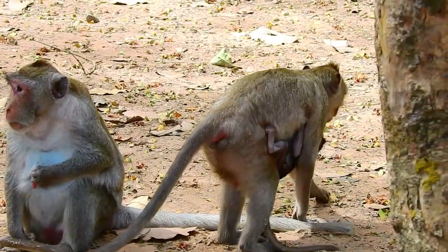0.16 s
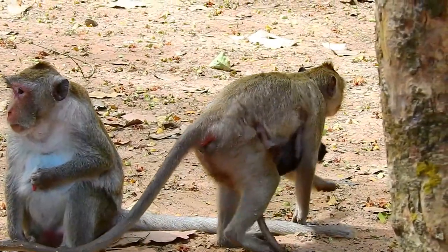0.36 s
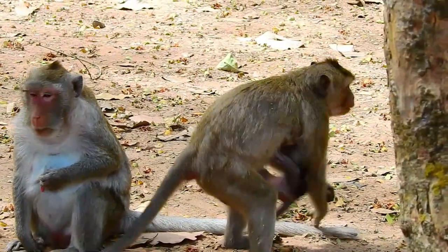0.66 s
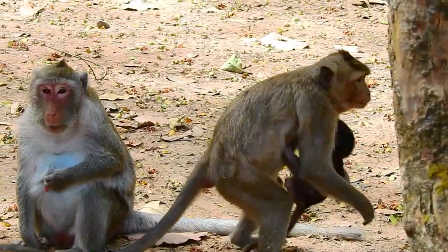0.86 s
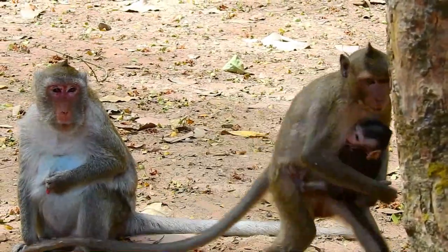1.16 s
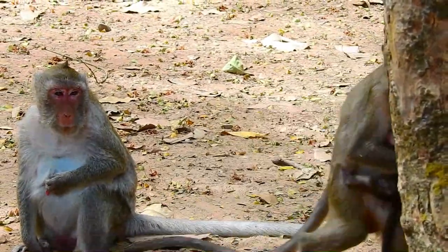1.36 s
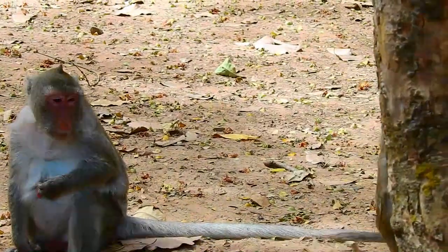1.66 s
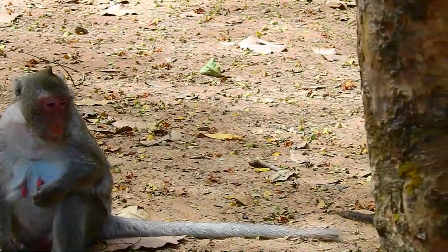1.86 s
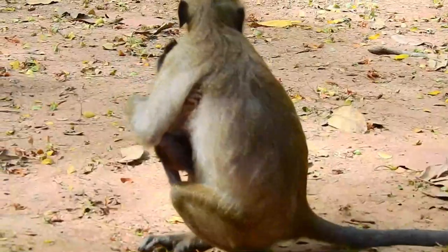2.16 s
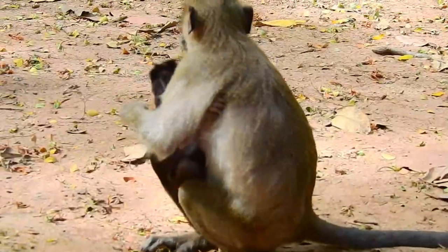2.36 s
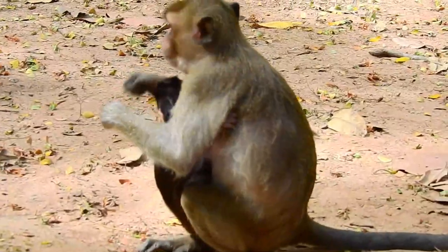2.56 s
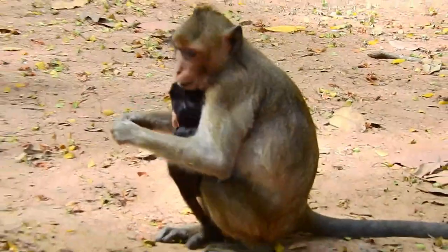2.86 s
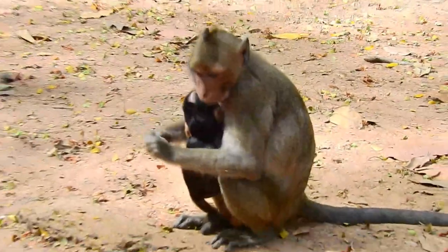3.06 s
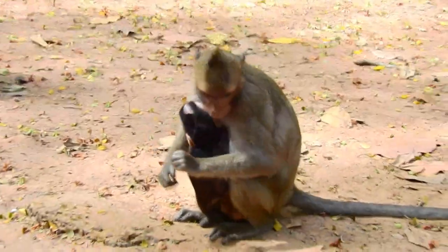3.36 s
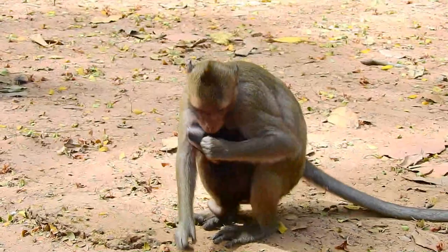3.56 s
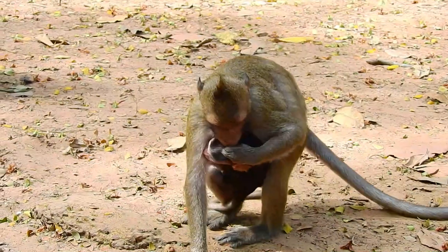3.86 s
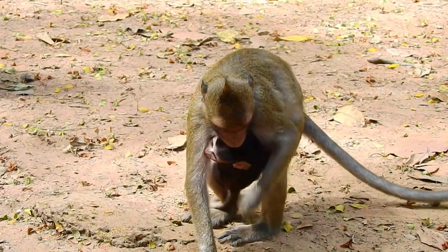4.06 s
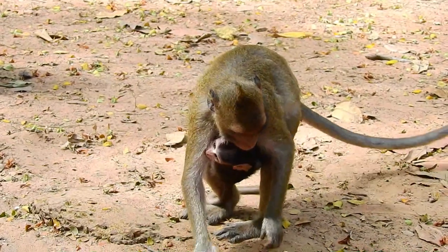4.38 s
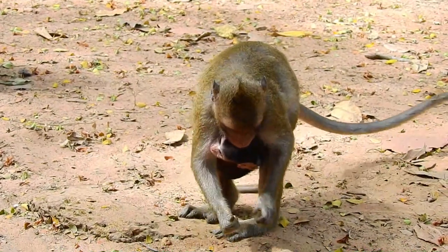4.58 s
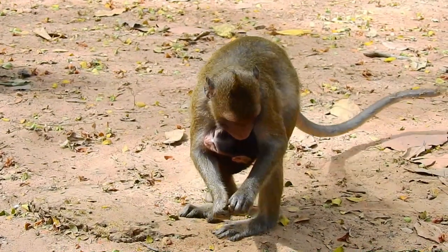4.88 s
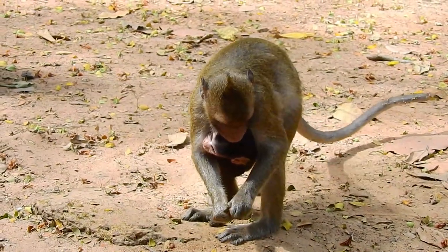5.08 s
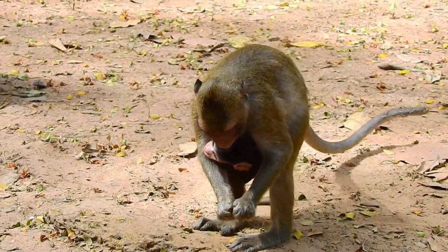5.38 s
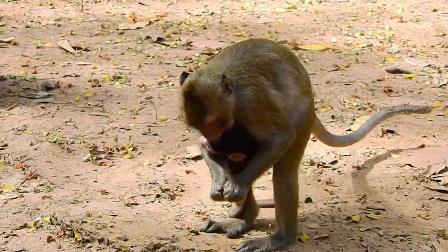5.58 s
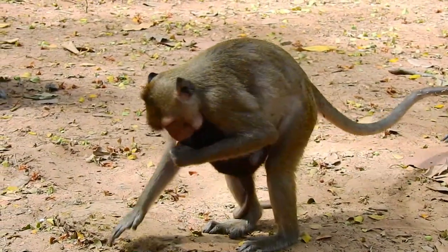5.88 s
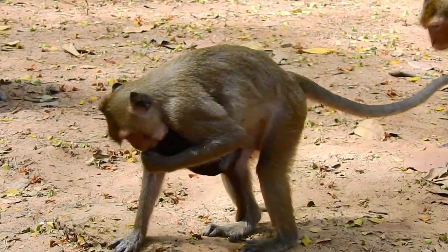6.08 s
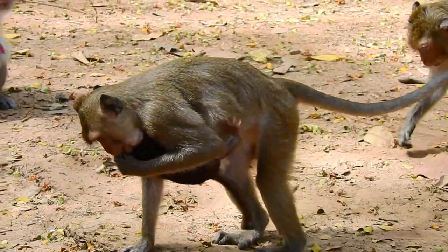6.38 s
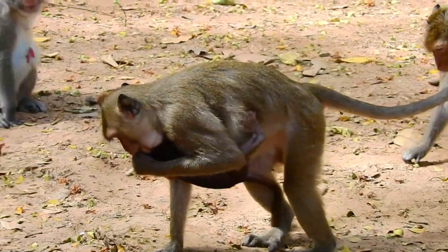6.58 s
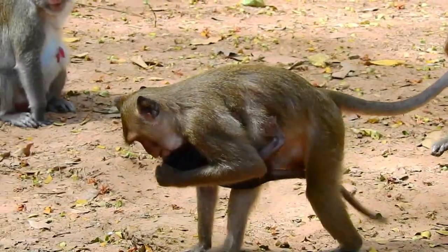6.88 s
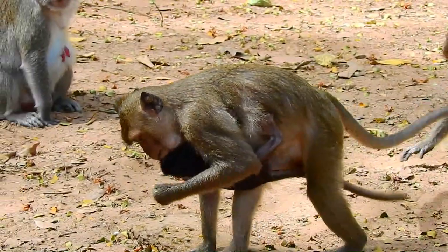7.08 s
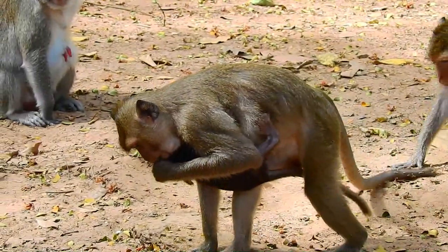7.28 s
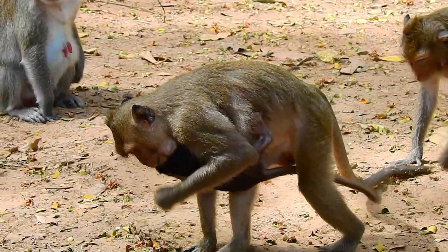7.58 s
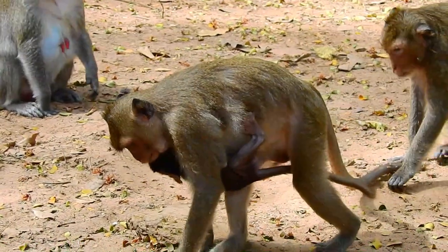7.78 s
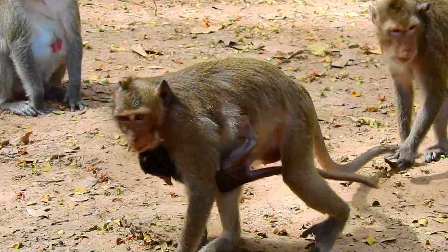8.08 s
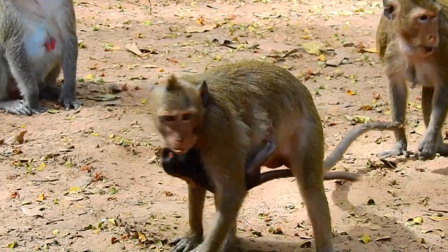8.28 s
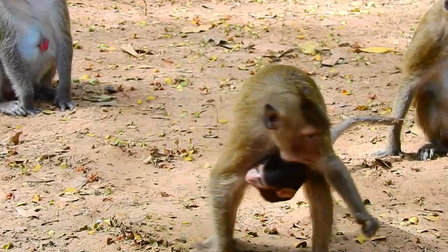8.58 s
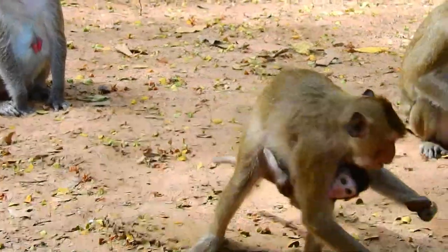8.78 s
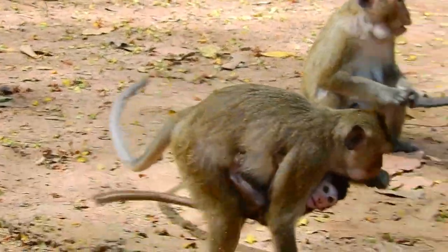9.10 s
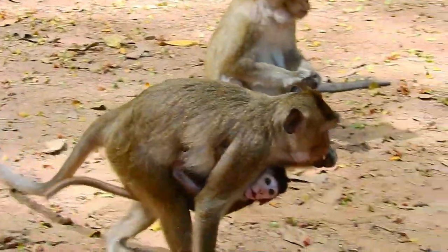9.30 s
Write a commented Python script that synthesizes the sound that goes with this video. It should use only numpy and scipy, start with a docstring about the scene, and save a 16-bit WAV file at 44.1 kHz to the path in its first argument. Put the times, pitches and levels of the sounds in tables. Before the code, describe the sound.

Harsh, high infant monkey cries near the microphone, one brief dropout, then soft echoing coos, barks and a yelp over low distant engine thudding.

```python
"""On open ground among trees, a far engine thuds and rumbles under faint air from the start.
Close to the microphone an infant macaque chirps, rasps and squeals, some calls with low falling tails.
Dry clicks and thin, high, far whistles come now and then; the sound drops out once for a moment.
Then faint echoed calls and another young macaque's coos ring through the wood; later the infant barks and yelps.
Voices are moving tones, roughened by flapping folds and coloured by the mouth; clicks ring modes; air is noise."""
import sys
import numpy as np
from scipy import signal
from scipy.fft import rfft, irfft, next_fast_len
from scipy.io import wavfile
from scipy.ndimage import uniform_filter1d

SR = 44100
rng = np.random.default_rng(int(sys.argv[2]) if len(sys.argv) > 2 else 0)


def master(y):
    """Save y as 16-bit WAV."""
    cut = np.clip(np.atleast_2d(y).T, -1, 1)
    pcm = np.round(cut * 32767)  # scale
    wavfile.write(sys.argv[1], SR, pcm.astype(np.int16))


N = 416304
TIME = np.arange(N) / SR
# In every table level_db is relative: colouring, distance and the stereo mix come after it.


def from_db(db):
    """Decibels to gain."""
    return 10 ** (np.asarray(db) / 20)


def rms_one(x):
    """Scale to rms 1."""
    return x / np.sqrt(np.mean(x ** 2) + 1e-20)


def at_hz(points, hz):
    """Read a table on a log-frequency axis."""
    points = np.array(points)
    return np.interp(np.log(np.maximum(hz, 1)), np.log(points[:, 0]), points[:, 1])


def colour(x, spectrum):
    """Give a signal a smooth spectrum."""
    size = next_fast_len(N + 4096)
    gain = from_db(at_hz(spectrum, np.fft.rfftfreq(size, 1 / SR)))
    return irfft(rfft(x, size) * gain, size)[..., :N]


def drift(rate_hz):
    """Slow chance with spread 1: noise through two equal one-pole lowpasses."""
    r = np.exp(-2 * np.pi * rate_hz / SR)
    slow = signal.lfilter([1], [1, -2 * r, r * r], rng.standard_normal(N + SR))
    return rms_one(slow[SR:])   # the first second lets the filter settle


def resonate(x, hz, width_hz):
    """One resonance with gain 1 on top."""
    r = np.exp(-np.pi * width_hz / SR)
    zeros = np.array([1, 0, -1]) * (1 - r * r) / 2
    poles = [1, -2 * r * np.cos(2 * np.pi * hz / SR), r * r]
    return signal.lfilter(zeros, poles, x + 1e-18)


def evened(x, window_s):
    """Hold the short-term rms at 1."""
    power = np.abs(uniform_filter1d(x * x, int(window_s * SR)))
    return x / np.sqrt(power + 1e-12)


def stereo_noise(spectrum, alike):
    """Coloured noise, partly alike in both channels; rms 1."""
    mid, side = rng.standard_normal((2, N))
    alike = np.clip(alike, 0, 1)
    both = np.sqrt(1 + alike) * mid + np.sqrt(1 - alike) * side * [[1], [-1]]
    return rms_one(colour(both, spectrum))


def pan(x, left_db):
    """Place a sound between the left and right channels by level."""
    return x * from_db(np.array([[left_db], [-left_db]]) / 2)


# spectrum of the far engine's thuds and rumble: freq_hz, level_db
RUMBLE_SPECTRUM = [(24, -63), (40, -12.5), (85, 5), (125, 3), (170, -1.5), (230, -12), (350, -15.5),
                   (1400, -22.5), (8000, -51.5)]
# the engine's course: time_s, level_db, depth_db (change of its deepest part)
ENGINE_COURSE = [(1.7, -44.5, -4), (2, -41, -2.5), (5.1, -44.5, 3.5), (6.1, -45, -4), (9.4, -48, 1.5)]


def engine(firing_hz=19.5, thud_db=-4, noise_db=-2, uneven_db=4):
    """A far engine: irregular exhaust pulses ring a low resonance in a bed of rumble."""
    turns = np.floor(np.cumsum(firing_hz * (1 + .1 * drift(4.64))) / SR)
    firings = np.diff(turns, prepend=0) * from_db(uneven_db * drift(16.2))
    thuds = rms_one(colour(resonate(firings, 119, 126), RUMBLE_SPECTRUM))
    sound = from_db(thud_db) * thuds + from_db(noise_db) * stereo_noise(RUMBLE_SPECTRUM, alike=0.95)
    time_s, level_db, depth_db = np.transpose(ENGINE_COURSE)
    rumble = from_db(np.interp(TIME, time_s, level_db)) * sound
    deep = colour(rumble, [(100, 0), (160, -25)])
    return rumble + (from_db(np.interp(TIME, time_s, depth_db)) - 1) * deep


# spectrum of the air around the microphone: freq_hz, level_db
AIR_SPECTRUM = [(200, -7), (1300, -13), (4200, -12), (6400, -8.5), (8000, -17), (15000, -56.5)]


def air(air_db=-57):
    """Faint, broad noise of the open place, slowly wavering in level."""
    return from_db(air_db + 1.3 * drift(4)) * stereo_noise(AIR_SPECTRUM, alike=0.61)


def note(length_s, attack_s, release_s):
    """Progress from 0 to 1 through a call, and its attack, hold and release."""
    t = TIME[:int((length_s + release_s) * SR)]
    release = np.clip(1 - (t - length_s) / release_s, 0, 1)
    return np.minimum(t / length_s, 1), np.minimum(t / attack_s, 1) * release


def slurred(notes):
    """Join notes into pitch, loudness and roughness; where two overlap the stronger leads."""
    power, pitch, rough = np.full(N, 1e-14), np.full(N, 5000 * 1e-14), np.zeros(N)
    for start, note_hz, gain, note_rough in notes:
        on = slice(int(start * SR), int(start * SR) + len(gain))
        power[on] += gain ** 2
        pitch[on] += gain ** 2 * note_hz
        rough[on] += gain ** 2 * note_rough
    return pitch / power, np.sqrt(power), np.clip(rough / power, 0, 1)


# near chirps, sliding up or down: start_s, length_s, first_hz, last_hz, level_db, final_roughness (0-1)
CHIRP_TABLE = [(0.414, 0.011, 3878, 3175, -35, 0.71), (2.375, 0.025, 4400, 6860, -29, 1.01),
               (2.888, 0.019, 4000, 7830, -24, 0.56), (3.414, 0.016, 4500, 6130, -22.5, 0.42),
               (6.188, 0.0083, 4000, 3720, -22, 0.29), (6.455, 0.02, 4900, 6700, -25, 0.51),
               (6.702, 0.027, 4000, 5250, -27.5, 0.71), (7.584, 0.021, 3400, 3900, -36.5, 0.54),
               (7.896, 0.0091, 2300, 1900, -52.5, 0)]


def chirp_notes(attack_s=0.0054, release_s=.008, onset_rough=0.2, tear_power=1.5):
    """A chirp starts nearly clean and tears towards the end of its slide."""
    for start, length, first_hz, last_hz, level_db, rough in CHIRP_TABLE:
        part, gain = note(length, attack_s, release_s)
        # a share of the roughness is there at once; a higher power brings the rest later
        strain = onset_rough + (1 - onset_rough) * part ** tear_power
        yield start, first_hz * (last_hz / first_hz) ** part, gain * from_db(level_db), rough * strain


# near rasps, torn from the first moment: start_s, length_s, first_hz, last_hz, level_db, roughness (0-1)
RASP_TABLE = [(0.424, 0.018, 4900, 6320, -25, 0.88), (0.447, 0.052, 6800, 4870, -28, .75),
              (0.506, .016, 6320, 5400, -25, 0.8), (0.523, 0.0194, 4680, 4436, -23, 0.58),
              (0.555, 0.038, 4410, 4200, -35.5, 0.78), (0.602, 0.0411, 6080, 5770, -30, 0.85),
              (0.645, .055, 5790, 6280, -34, 0.77), (0.705, 0.095, 6200, 7080, -40, 0.94),
              (1.033, 0.051, 6040, 7200, -37, 0.94), (1.26, .025, 4900, 4363, -25, .7),
              (1.966, 0.044, 6250, 6000, -27, 0.63), (2.42, .012, 6550, 6280, -26.5, 0.89),
              (2.529, 0.044, 5000, 4730, -26.5, .88), (2.577, 0.042, 4860, 6600, -29.5, 0.59),
              (2.617, 0.048, 6560, 5455, -26, 0.81), (2.651, 0.024, 4654, 3130, -24, 0.65),
              (2.912, 0.024, 7000, 6500, -24, 0.97), (3.017, 0.045, 4990, 4560, -24.5, .85),
              (3.066, .097, 4073, 3730, -26.5, 0.74), (3.167, 0.027, 4040, 3146, -28, 0.59),
              (3.438, 0.016, 4430, 4290, -24.5, 0.55), (3.49, .022, 6090, 5885, -24, 0.62),
              (3.514, 0.035, 3786, 3913, -24.5, 0.6), (3.556, 0.031, 3850, 3667, -25, 0.9),
              (6.5, .02, 4430, 4270, -24, 0.72), (6.53, 0.043, 6500, 6060, -33.5, 0.6),
              (6.574, 0.02137, 4600, 4180, -26.5, .9), (6.596, 0.035, 4200, 3810, -24.5, 0.67),
              (6.77, 0.043, 6770, 6420, -36.5, 0.6), (6.83, .006, 4350, 4216, -24, 0.51)]


def rasp_notes(attack_s=0.0046, release_s=0.018, sag_db=3.5):
    """A rasp starts hard and stays rough while its pitch slides and its level sags."""
    for start, length, first_hz, last_hz, level_db, rough in RASP_TABLE:
        part, gain = note(length, attack_s, release_s)
        level = from_db(level_db - sag_db * part)
        yield start, first_hz * (last_hz / first_hz) ** part, gain * level, rough


# near squeals, whistled arches that flutter in the middle:
# start_s, length_s, first_hz, middle_hz, last_hz, level_db, roughness (0-1)
SQUEAL_TABLE = [(0.824, 0.062, 7650, 8100, 7403, -45.5, 0.3), (1.09, 0.048, 8300, 10260, 11900, -49.5, 0.1),
                (1.138, 0.053, 10370, 10720, 10560, -37.5, 0.77),
                (1.202, 0.047, 11500, 10240, 9530, -42, .05), (2.02, 0.056, 7276, 8370, 7650, -38, 0.2),
                (2.449, 0.071, 9700, 12000, 9900, -51.5, 0.65), (2.924, .09, 8750, 10230, 9160, -40, 0.9),
                (6.476, 0.081, 8500, 9400, 9000, -38, 0.94), (6.733, 0.097, 6980, 8400, 7860, -42, 0.76)]


def squeal_notes(attack_s=0.0036, release_s=0.0096, tear_power=0.22):
    """A squeal's pitch follows a parabola and frays towards the middle."""
    for start, length, first_hz, middle_hz, last_hz, level_db, rough in SQUEAL_TABLE:
        part, gain = note(length, attack_s, release_s)
        arch = 1 - (2 * part - 1) ** 2
        slide = first_hz + (last_hz - first_hz) * part
        pitch = slide + (middle_hz - (first_hz + last_hz) / 2) * arch
        yield start, pitch, gain * from_db(level_db), rough * arch ** tear_power


# mouth resonances that flare and fade inside a torn call: freq_hz, width_hz
MOUTH_FLARES = [(3800, 1200), (4550, 350), (6300, 650)]


def voice(notes, throat, flap_hz, flap_wander, chaos, bend, rasp_db, buzz_db, overtone_db, flare_db):
    """Folds whistle; pressed, a slower flapping splits off side tones and, turning chaotic, tears the whistle."""
    pitch, loud, rough = slurred(notes)
    # the flapping glides slowly and turns chaotic at the greatest strain; every other flap is then uneven
    flap_rate = flap_hz * (1 + flap_wander * (drift(40) + chaos * rough ** 4 * drift(350)))
    flap_phase = 2 * np.pi * np.cumsum(flap_rate) / SR
    flap = np.sin(flap_phase) + .7 * chaos * rough * drift(150) * np.sin(flap_phase / 2)
    slow_waver = (.006 + .03 * chaos * rough) * drift(70)
    fast_waver = .03 * chaos * rough ** 2 * drift(400)
    pitch = pitch * (1 + slow_waver + fast_waver)
    phase = 2 * np.pi * np.cumsum(pitch) / SR
    # overtones only carry inside the mouth's passband, applied twice
    second = np.sin(2 * phase) * (2 * pitch < SR / 2)
    third = np.sin(3 * phase) * (3 * pitch < SR / 2)
    overtones = colour(colour(second + third, throat), throat)
    whistle = np.sqrt(2) * (np.sin(phase) + from_db(overtone_db) * overtones)
    # each flap bends the tone, lets a puff of air through and shuts with a sharp pulse
    bent = phase + bend * rough * flap
    puff = np.exp(.7 * rough * flap)
    pulses = rms_one(np.exp(40 * (np.cos(flap_phase) - 1)))
    buzz = from_db(buzz_db) * rough * (pulses - pulses.mean())
    rasp = from_db(rasp_db) * rough * rng.standard_normal(N)
    torn = colour((np.sin(bent) + rasp) * puff + buzz, throat)
    flares = sum(resonate(torn, hz, width) * from_db(flare_db + 7 * drift(45)) for hz, width in MOUTH_FLARES)
    torn = evened(torn + flares, .004)
    tear = np.sin(np.pi / 2 * rough)
    mixed = evened((1 - tear ** 2) * whistle + tear * torn, .004)
    return loud * mixed * from_db(1.5 * rough * drift(70))


# the infant's throat and open mouth: freq_hz, level_db
OPEN_THROAT = [(1300, -19), (2700, -14.5), (3600, -6.5), (5200, -1.5), (6400, 3), (7600, 0), (10500, -3.5),
               (15000, -29.5)]
# the mouth drawn back for a squeal: freq_hz, level_db
DRAWN_THROAT = [(1000, -18.5), (3600, -13), (6400, 1.5), (8000, -0.5), (10700, -5.5), (15500, -16.5)]


def infant_cries():
    """Close to the microphone, chirps and rasps tear chaotically; thin squeals above them flutter evenly."""
    torn = voice([*rasp_notes(), *chirp_notes()], OPEN_THROAT, flap_hz=1100, flap_wander=.18, chaos=1.15,
                 bend=1.5, rasp_db=-10, buzz_db=-13, overtone_db=-14, flare_db=-3)
    thin = voice(squeal_notes(), DRAWN_THROAT, flap_hz=925, flap_wander=.015, chaos=.15,
                 bend=2.1, rasp_db=-13, buzz_db=1, overtone_db=-8, flare_db=-12)
    return torn + thin


# near dry clicks: time_s, level_db (peak before colouring), sharpness (0 dull knock - 1 bright snap)
CLICK_TABLE = [(0.828, -47.5, 0.08), (2.738, -39.5, 0.67), (3.033, -37, 0.24), (3.484, -24.5, 0.99),
               (6.967, -35, 0.28), (6.978, -29, 1), (7.474, -39.5, 0.014), (7.4856, -30, 1),
               (7.496, -36.5, 0.94), (8.738, -40, 0), (9.021, -42.5, 0.01)]
# what the clicks ring with: freq_hz, level_db, t60_s
RINGING_MODES = [(657, 14.5, 0.043), (1054, 15, 0.01), (1850, 5.5, 0.0036), (5620, -6.5, 0.0012)]


def clicks(crush_s=0.0024, split_hz=4000, leak=0.016):
    """A brief crush rings the modes: the low ones in a knock, the high ones in a snap."""
    out, t = np.zeros(N), TIME[:SR // 20]
    for time_s, peak_db, sharp in CLICK_TABLE:
        crush, hit = rng.standard_normal(len(t)) * np.exp(-t / crush_s), 0
        for hz, mode_db, t60 in RINGING_MODES:
            share = leak + (sharp if hz > split_hz else 1 - sharp)
            ring = resonate(crush, hz, np.log(1000) / (np.pi * t60))
            hit = hit + share * from_db(mode_db) * ring
        at = int(time_s * SR)
        out[at:at + len(t)] += from_db(peak_db) * hit / np.abs(hit).max()
    return colour(out, [(9000, 13.0), (16000, -28)])


# falling whistles: thin high ones far off, and lower falling tails and chirps of the infant's calls:
# start_s, end_s, first_hz, last_hz, level_db
FALLING_WHISTLES = [(1.595, 1.625, 7010, 5900, -46), (2.101, 2.19, 8660, 6590, -47.5),
                    (3.575, 3.61, 2720, 1580, -43.5), (4.251, 4.366, 7230, 5000, -44.5),
                    (7.155, 7.2, 2344, 1266, -46), (8.239, 8.379, 7460, 4560, -48.5)]
# very distant calls, heard only by their echo: start_s, end_s, first_hz, last_hz, level_db
DISTANT_CALLS = [(1.9, 2.25, 1784, 1590, -51), (2.9, 3.35, 1669, 1517, -53.5),
                 (4.2, 4.85, 1908, 2059, -51.5)]


def whistles(table, waver=0.0131):
    """Near-pure, slightly wavering tones that slide from one pitch to another."""
    out, wobble = np.zeros(N), 1 + waver * drift(70)
    for start, end, first_hz, last_hz, level_db in table:
        on = (TIME > start) & (TIME < end)
        part = (TIME[on] - start) / (end - start)
        pitch = (first_hz + (last_hz - first_hz) * part) * wobble[on]
        tone = np.sin(2 * np.pi * np.cumsum(pitch) / SR)
        out[on] += from_db(level_db) * np.sin(np.pi * part) * tone
    return out


# coos farther off: start_s, end_s, pitch_hz (top of the arch, before wavering), level_db, mouth_hz (resonance)
COO_TABLE = [(2.06, 2.308, 881, -39, 3885), (3.599, 3.829, 908, -37.5, 4000),
             (4.232, 4.489, 856, -39.5, 3620), (4.47, 4.748, 916, -38, 3880),
             (5.317, 5.585, 875, -39.5, 3250), (6.347, 6.598, 864, -39, 3000),
             (6.648, 6.939, 919.7, -39, 3700), (7.169, 7.472, 863, -42, 2404),
             (8.837, 9.024, 937, -44.5, 3600), (8.99, 9.263, 931, -38, 3700)]
# colour of a coo apart from the mouth resonance: freq_hz, level_db
COO_SPECTRUM = [(900, -36.5), (1800, -20), (2700, -15.5), (3650, -11.5), (4500, -26.5), (5400, -9.5),
                (6400, -17), (7600, -14.5), (11000, -43)]


def coos(arch=3, flutter_db=4.0, count=8, mouth_gain_db=8, mouth_width_hz=600):
    """Wavering harmonic arches; the mouth lifts nearby harmonics, and each fades by itself on the long way."""
    out, waver = np.zeros(N), 1 + .012 * drift(25) + .011 * drift(200)
    fading = [from_db(flutter_db * drift(11.6)) for _ in range(count)]
    for start, end, top_hz, level_db, mouth_hz in COO_TABLE:
        on = np.flatnonzero((TIME > start) & (TIME < end))
        off_top = np.abs(2 * (TIME[on] - start) / (end - start) - 1)   # 0 mid-coo, 1 at both ends
        pitch = top_hz * (1 - .15 * off_top ** arch) * waver[on]
        phase = 2 * np.pi * np.cumsum(pitch) / SR
        for k, fade in enumerate(fading, 1):
            mouth_db = mouth_gain_db / (1 + (2 * (k * pitch - mouth_hz) / mouth_width_hz) ** 2)
            gain = from_db(level_db + mouth_db + at_hz(COO_SPECTRUM, k * pitch))
            out[on] += gain * (1 - off_top ** 3) * fade[on] * np.sin(k * phase)
    return out


def harmonics(pitch, count):
    """Equally strong harmonics of a moving pitch."""
    phase = 2 * np.pi * np.cumsum(pitch) / SR
    return sum(np.sin(k * phase) for k in range(1, count + 1))


# near barks: start_s, length_s, first_hz, last_hz, level_db
BARK_TABLE = [(6.105, 0.031, 1186, 950, -28), (6.186, 0.024, 1411, 916, -29),
              (7.601, 0.025, 1348, 1014, -39.5), (8.898, 0.026, 1450, 1130, -39)]


def bark_notes(drop_power=2.3, attack_s=0.0083, release_s=0.0071, swell_db=3.5):
    """A bark drops in pitch fast, then levels out while the mouth opens and the level swells."""
    for start, length, first_hz, last_hz, level_db in BARK_TABLE:
        part, gain = note(length, attack_s, release_s)
        opening = np.sin(np.pi / 2 * part) ** 2
        pitch = last_hz + (first_hz - last_hz) * (1 - part) ** drop_power
        yield start, pitch, gain * from_db(level_db - swell_db * (0.5 - opening)), opening


# the mouth at the start of a bark: freq_hz, level_db
BARK_MOUTH_SHUT = [(1300, -43), (2100, 11.5), (3800, 2), (5000, -41.5)]
# the mouth wide open: freq_hz, level_db
BARK_MOUTH_OPEN = [(1300, -26.5), (1900, -10), (4700, 0.5), (6700, 2.5), (7800, -19), (15000, -29)]


def barks(jitter=.06, hoarse_db=3):
    """A hoarse stack of harmonics and noise whose colour shifts as the mouth opens."""
    pitch, loud, opening = slurred(bark_notes())
    hoarseness = from_db(hoarse_db) * rng.standard_normal(N)
    folds = harmonics(pitch * (1 + jitter * drift(240)), count=9) + hoarseness
    shut, wide = colour(folds, BARK_MOUTH_SHUT), colour(folds, BARK_MOUTH_OPEN)
    return loud * evened((1 - opening) * shut + opening * wide, 0.0027)


# one clear near yelp that arches and trails away downwards: time_s, pitch_hz, level_db
YELP_COURSE = [(9.205, 1350, -74), (9.237, 1990, -34), (9.26, 2073, -31), (9.276, 1806, -36.5),
               (9.292, 1382, -44), (9.321, 1119, -50.5), (9.36, 905, -70)]
# colour of the yelp: freq_hz, level_db
YELP_SPECTRUM = [(950, -2.5), (1900, 0.5), (4600, -5.5), (5900, 4.5), (8000, -20), (12000, -39)]


def yelp(waver=0.0065):
    """A clear harmonic call on one pitch arch."""
    time_s, pitch_hz, level_db = np.transpose(YELP_COURSE)
    pitch = np.interp(TIME, time_s, pitch_hz) * (1 + waver * drift(116))
    loud = np.interp(TIME, time_s, from_db(level_db), left=0, right=0)
    return colour(harmonics(pitch, count=6) * loud, YELP_SPECTRUM)


def scatter(x, t60_table, build_s):
    """Countless faint echoes off trunks, leaves and ground, different per channel; each band has its own decay."""
    t, edges, tail = TIME[:2 * SR], np.geomspace(400, 18000, 9), 0
    for low, high in zip(edges, edges[1:]):
        bandpass = signal.butter(2, [low, high], "band", fs=SR, output="sos")
        band = signal.sosfilt(bandpass, rng.standard_normal((2, len(t))))
        tail = tail + band * 1000 ** (-t / at_hz(t60_table, np.sqrt(low * high)))
    tail = tail * (1 - np.exp(-t / build_s))
    tail = tail / np.sqrt(np.sum(tail ** 2) / 2)
    return signal.fftconvolve(x[None], tail, axes=1)[:, :N]


# how long the wood rings, the treble dying first: freq_hz, t60_s
WOOD_DECAY = [(1800, 1.6), (3600, 1.3), (10000, .45)]


def scene(trunk_echo_s=0.045, trunk_echo_db=-15):
    """Cries, clicks, barks and yelp are near and fairly dry; whistles and coos are wrapped in the wood's echo."""
    background = pan(engine() + air(), left_db=-1.8)
    near = infant_cries() + clicks() + barks() + yelp()
    echoing = whistles(FALLING_WHISTLES) + coos()
    ground = from_db(-6) * scatter(near, [(2000, 0.086)], build_s=0.0015)
    # one distinct echo of the near sounds off a trunk
    dulled = colour(near, [(1900, -7), (4500, 1), (11000, -12)])
    trunk_echo = np.pad(dulled, (int(trunk_echo_s * SR), 0))[:N]
    ground = ground + from_db(trunk_echo_db) * trunk_echo
    into_wood = from_db(-14.0) * dulled + from_db(-2.5) * echoing + whistles(DISTANT_CALLS)
    wood = scatter(into_wood, WOOD_DECAY, build_s=0.00069)
    wood = wood + 0.47 * wood[::-1]   # each channel also picks up some of the other side
    return pan(near + ground, left_db=-.5) + from_db(3.0) * echoing + wood + background


# the moment of silence: start_s, end_s
SILENT_MOMENT = (1.705, 1.956)


def record(dry, cutoff_hz=15800):
    """All sound fades out briefly and returns faster; a steep lowpass cuts the top."""
    start, end = SILENT_MOMENT
    live = np.interp(TIME, [start, start + .015, end, end + .002], [1, 0, 0, 1])
    lowpass = signal.ellip(10, .1, 80, cutoff_hz, fs=SR, output="sos")
    return signal.sosfilt(lowpass, dry * live)


dry = scene()
out = record(dry)
master(out)
```